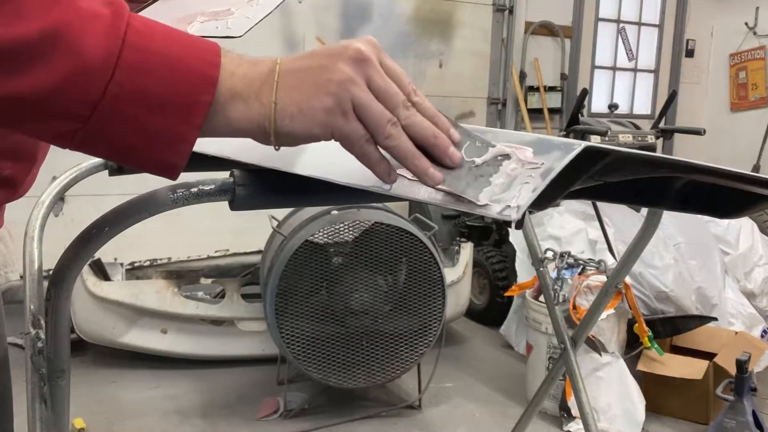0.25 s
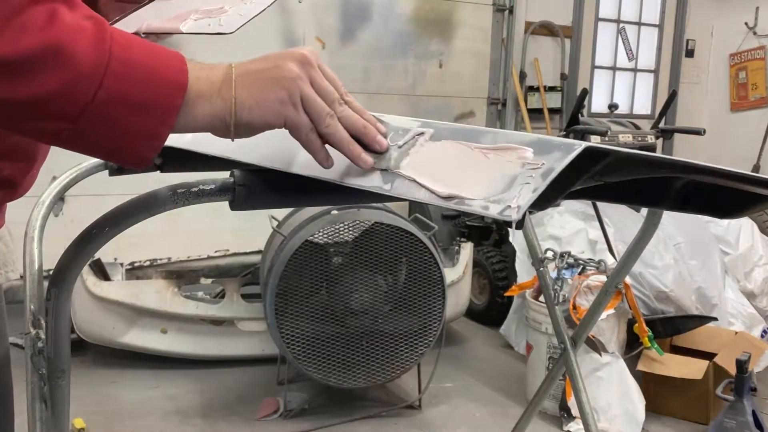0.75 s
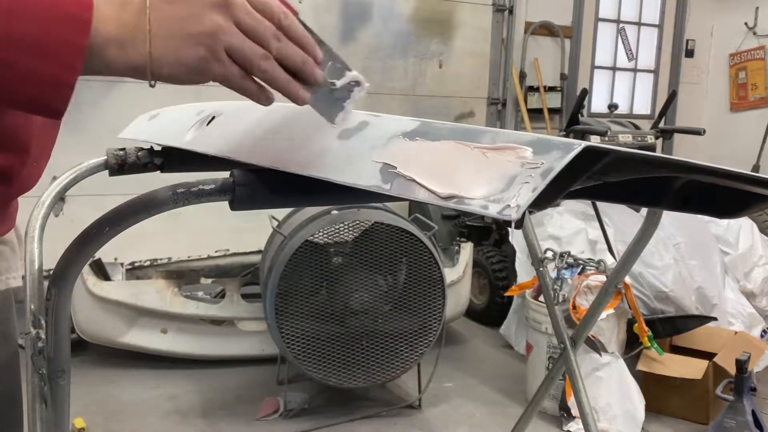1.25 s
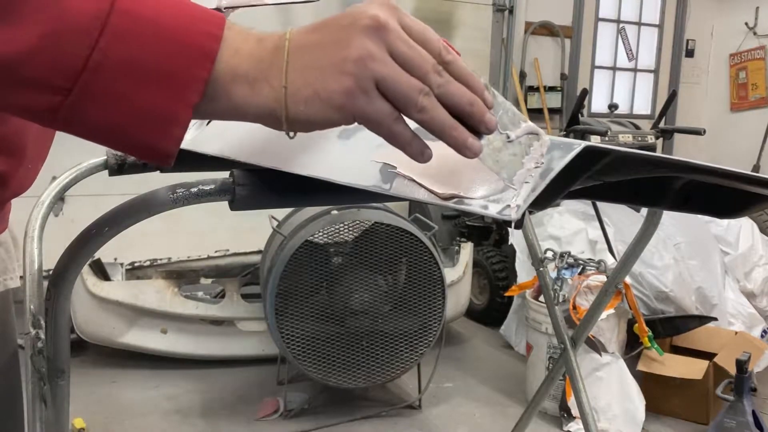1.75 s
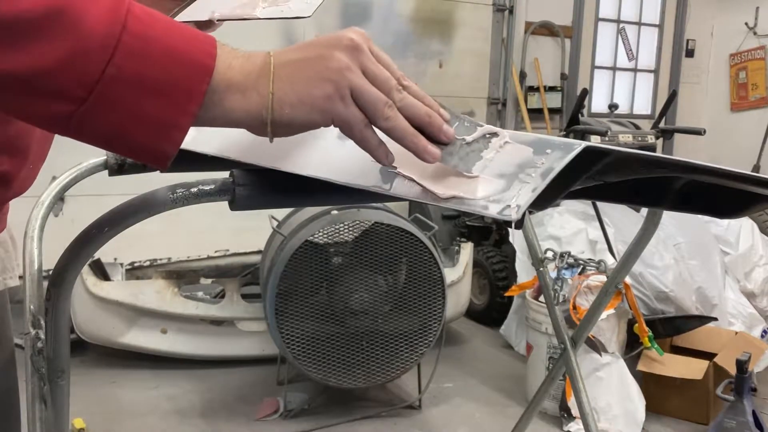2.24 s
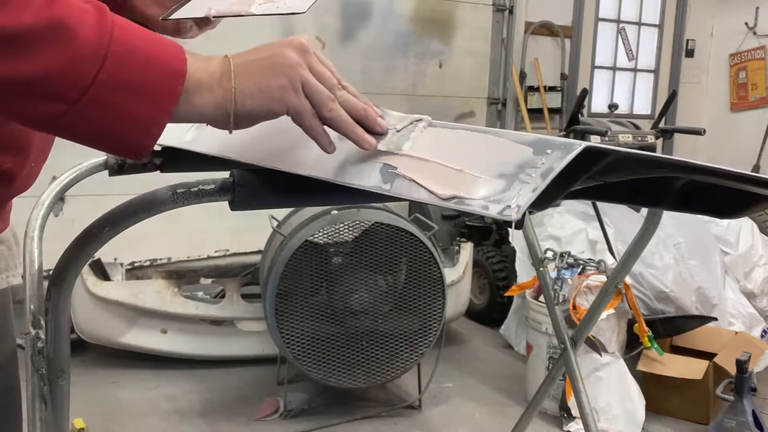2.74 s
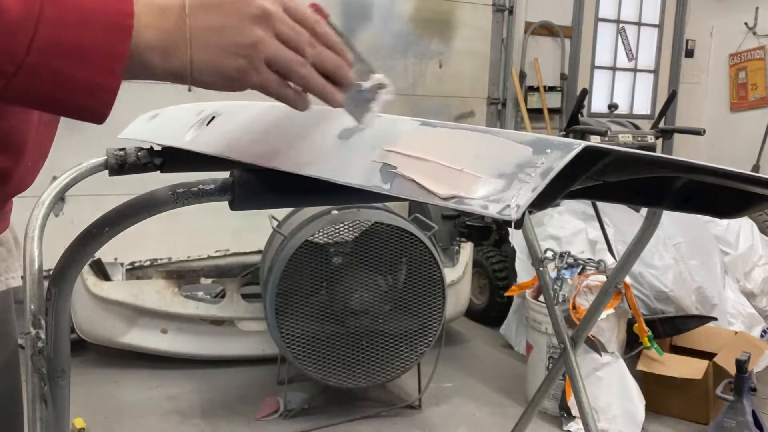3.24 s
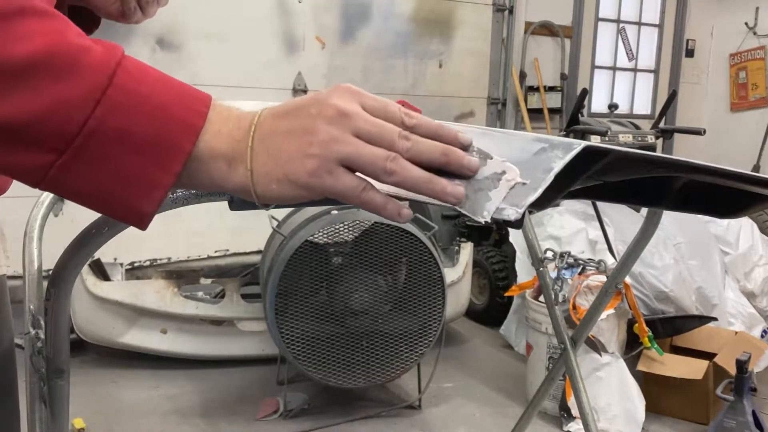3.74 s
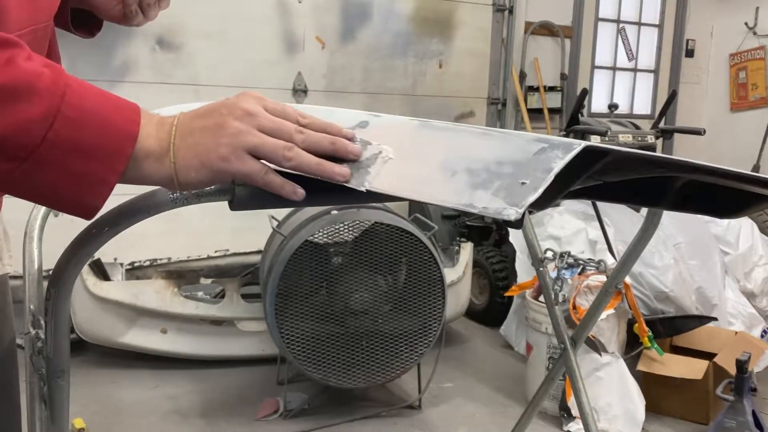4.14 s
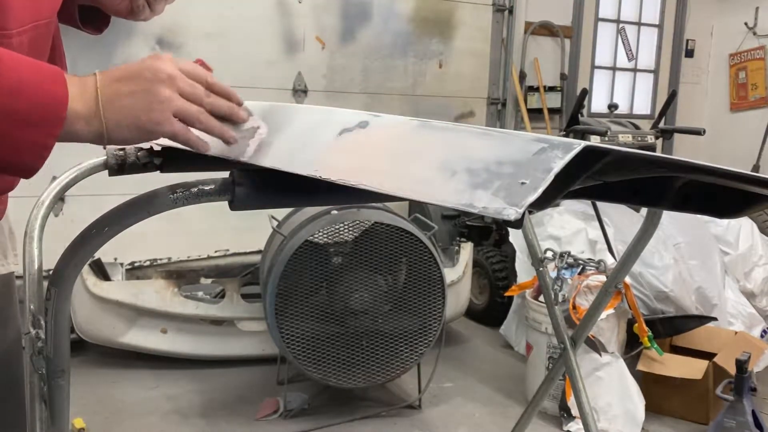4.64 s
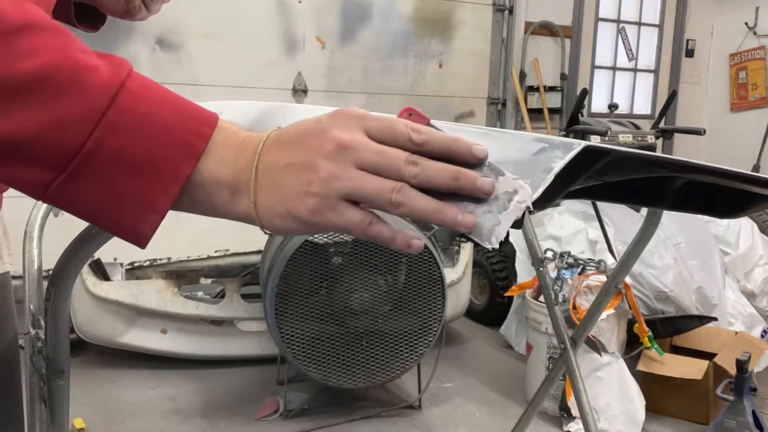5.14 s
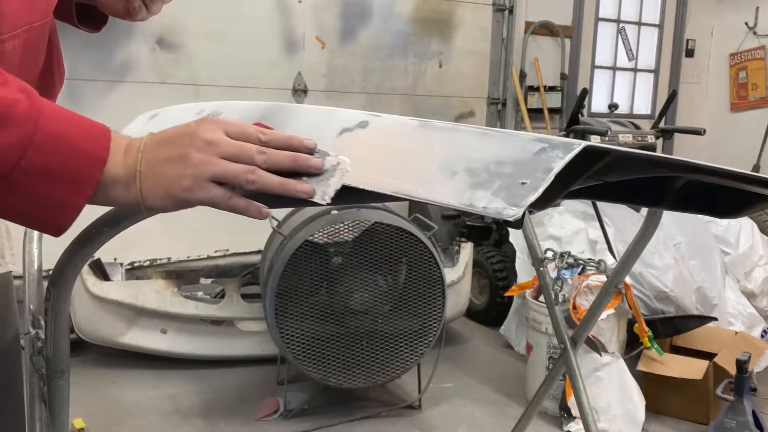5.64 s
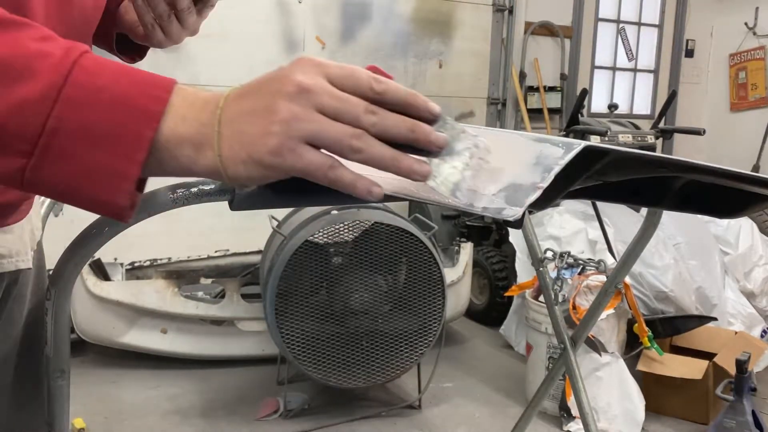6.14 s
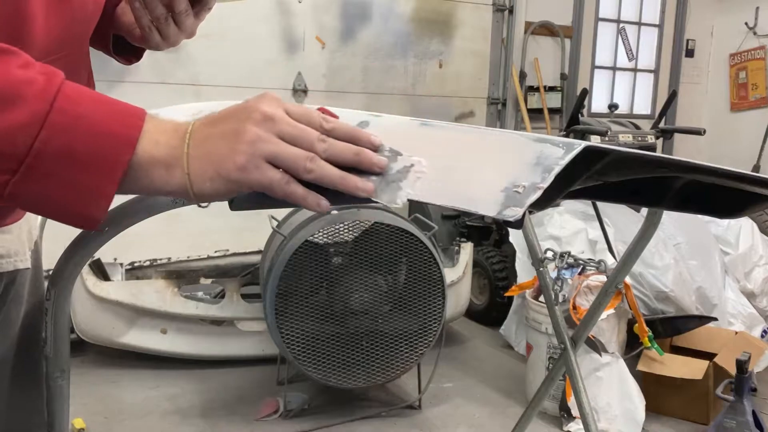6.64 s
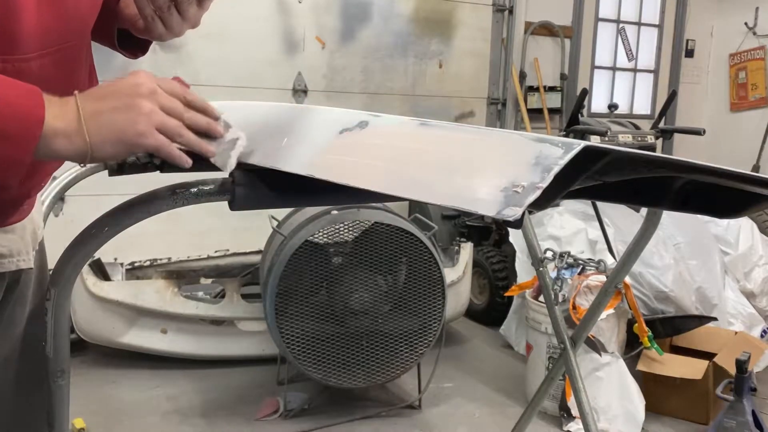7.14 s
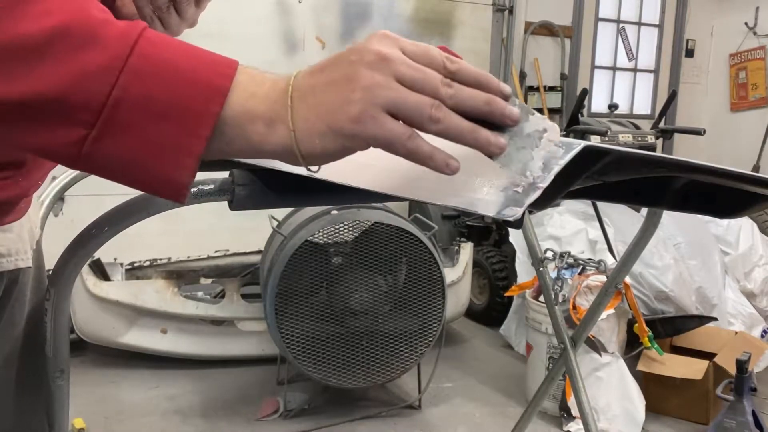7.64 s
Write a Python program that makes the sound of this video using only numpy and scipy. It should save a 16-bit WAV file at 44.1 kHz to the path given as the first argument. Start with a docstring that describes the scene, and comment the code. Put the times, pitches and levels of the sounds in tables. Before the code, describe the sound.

In a hard-walled garage, a plastic spreader lays filler on a sheet-metal panel. It taps down, rasps dryly for a fraction of a second, flicks off with a bright snap, then nearly vanishes as it glides over wet filler. Roughly one stroke comes per second, with louder slaps before two and near three and a half seconds and a brief judder past five. Close stereo microphones catch short room echoes and low, steady air.

```python
"""In a garage, a plastic spreader lays body filler on a sheet-metal panel on a stand.
The blade knocks down, rasps over bare metal until it flicks off, and glides almost silently on wet filler.
Rubbing is noise made of tiny slips; landings are noise bursts, snaps and a squeak are decaying or gliding tones.
Rubbing and knocks ring the panel, and the hard room answers at two microphones over steady room air."""
import sys
import numpy as np
from scipy import signal
from scipy.fft import rfft, irfft, next_fast_len
from scipy.io import wavfile
from scipy.ndimage import uniform_filter1d

SR = 44100
rng = np.random.default_rng(int(sys.argv[2]) if len(sys.argv) > 2 else 0)


def dump(signal):
    """Clip the signal to [-1, 1] and save it as 16-bit WAV at the path in sys.argv[1]."""
    limited = np.clip(np.atleast_2d(signal).T, -1, 1)
    pcm = np.round(limited * 32767).astype(np.int16)
    wavfile.write(sys.argv[1], SR, pcm)


N = 347508
TIME = np.arange(N) / SR
CLOCK = np.arange(0, N / SR, .001)  # coarse time in seconds, for the movements of the hand

# The blade rasps over bare metal and flicks off. All levels are relative, before the mix.
# Each row: start in seconds, lift in seconds, attack in seconds, level in dB, swell in dB, brightness in dB,
# flick in dB, flick length in seconds, brightening in the flick in dB, favoured resonance in Hz, its gain in dB,
# sway of the stand in dB.
RASPS = [ (0.124, 0.288, 0.055, -32, -4.5, -7.5, -1.5, 0.0039, 21, 1710, 4, -43.5),
         (0.968, 1.141, 0.057, -36.5, 4.5, -2, 8, 0.0078, 6.5, 1710, 0.5, -48.5),
         (1.942, 2.099, 0.051, -35, 1, -4.5, 2.5, 0.045, -12.5, 1900, -2.5, -66),
         (2.867, 3.112, 0.045, -36, 4.5, 0.5, 2, 0.027, 5.5, 1720, 2, -56),
         (3.737, 3.879, 0.021, -37.5, 7.5, -12.5, 4, 0.016, 8, 4560, 3, -56),
         (4.394, 4.536, 0.033, -35.5, 2, 2.5, 3, 0.012, 1, 10270, 2.5, -47.5),
         (5.73, 5.858, 0.024, -31.5, -1, 0.5, 10, 0.041, 6, 553, 6, -49.5),
         (6.371, 6.44, 0.036, -39, -1, -14.5, 3.5, 0.016, 11, 2430, 1.5, -72.5),
         (6.976, 7.093, 0.024, -35.5, 10, 4.5, 6, 0.03, -4.5, 403, 10.5, -68.5)]
# The blade glides on wet filler. Each row: start in seconds, end in seconds, level in dB, swell in dB,
# final brightness in dB, favoured resonance in Hz, its gain in dB, sway of the stand in dB.
GLIDES = [ (0.55, 0.85, -80, 23.5, -2.5, 1420, -6, -44), (0.775, 1.0, -61, -3.5, 15.5, 1450, 12, -50),
          (2.283, 2.697, -64, -5, -0.5, 820, 9.5, -45.5), (2.594, 2.94, -68.5, 12, 8, 1690, -14, -66),
          (4.2, 4.444, -79.5, 15, 3, 830, 11, -58.5), (4.82, 5.168, -66.5, -9, -4, 840, 15, -66),
          (6.45, 6.74, -60.5, -10.5, -3, 3700, 6, -58), (6.60, 7.03, -69, 3, -0.5, 784, 13.5, -50)]
# The blade lands on the panel. Each row: time in seconds, level in dB, settling time in seconds,
# level of the edge's tick in dB, favoured resonance in Hz, its gain in dB, sway of the stand in dB.
LANDINGS = [ (0.0, -31, 0.0063, -40, 366, 15.5, -44), (1.841, -23.5, 0.008, -33.5, 1000, -17, -59),
            (3.63, -24.5, 0.0078, -29.5, 645, 2.5, -46), (3.696, -35.5, 0.007, -44, 960, 3, -62),
            (6.302, -36, 0.0092, -63, 620, 10, -57), (7.71, -46, 0.014, -58.5, 420, -13, -62)]

RELEASE_S = 0.026  # once lifted, the rasp dies away
# The blade, dragged flat, judders once: pressed harder up to a crest, then eased off.
JUDDER_START_S, JUDDER_CREST_S, JUDDER_END_S = 5.187, 5.462, 5.55


def gain_of(db):
    """Decibels to a factor."""
    return 10 ** (np.asarray(db) / 20)


def evened(x):
    """Scales to rms 1."""
    return x / np.sqrt(np.mean(x ** 2) + 1e-20)


def read(points, hz):
    """Joins the points by straight lines over log frequency."""
    f, value = np.transpose(points)
    return np.interp(np.log(hz + 1), np.log(f + 1), value)


def add(mix, s, sound):
    """Mixes a sound in at a time in seconds."""
    part = mix[max(round(s * SR), 0):][:len(sound)]
    part += sound[:len(part)]


def ramp(s, length_s):
    """Rises from 0 to 1, starting at a time."""
    return np.clip((CLOCK - s) / length_s, 0, 1)


def coloured(x, spectrum):
    """Gives a sound a spectrum, at rms 1."""
    length = x.shape[-1]
    size = next_fast_len(length)
    colour = gain_of(read(spectrum, np.fft.rfftfreq(size, 1 / SR)))
    return evened(irfft(rfft(x, size) * colour, size)[..., :length])


def joined(contacts):
    """Joins the (level, brightness dB) of several contacts; the louder one weighs more in the brightness."""
    level, bright_db = np.array(contacts).transpose(1, 0, 2)
    total = level.sum(0)
    return total, (level * bright_db).sum(0) / (total + 1e-12)


def rasping(bite_s=0.018, bite_dull_db=-1.5, dulling_db_per_s=1102, dullest_db=-35):
    """Level and brightness of the rasps: the edge bites, pressure swells, a flick, then release, treble first."""
    contacts = []
    for start, lift, attack_s, db, swell_db, bright_db, flick_db, flick_s, flick_bright_db, *_ in RASPS:
        flick = np.exp(-((CLOCK - lift) / flick_s) ** 2)
        lifted_s = np.maximum(CLOCK - lift, 0)
        pressure_db = db + swell_db * ramp(start, lift - start) + flick_db * flick
        level = ramp(start, attack_s) * gain_of(pressure_db) * np.exp(-lifted_s / RELEASE_S)
        # duller until the edge bites
        bright = bright_db + bite_dull_db * (1 - ramp(start, bite_s))
        bright = bright + flick_bright_db * flick - dulling_db_per_s * lifted_s
        contacts.append((level, np.maximum(bright, dullest_db)))
    return joined(contacts)


def gliding(fade_s=0.095, thinning_db_per_s=38):
    """Level and brightness of the glides: soft ends, an even swell, brighter as the filler thins out."""
    contacts = []
    for start, end, db, swell_db, bright_db, *_ in GLIDES:
        along = ramp(start, end - start)
        ends = ramp(start, fade_s) * (1 - ramp(end - fade_s, fade_s))
        bright = bright_db - thinning_db_per_s * (end - start) * (1 - along)
        contacts.append((ends * gain_of(db + swell_db * along), bright))
    return joined(contacts)


def juddering(attack_s=0.014, crest_db=-32, crest_bright_db=-2, eased_bright_db=-5):
    """Level and brightness of the judder: both grow with pressure up to the crest, then fall."""
    press_db_per_s, ease_db_per_s, bright_per_db = 12, 78, 3.5
    press_s, ease_s = JUDDER_CREST_S - JUDDER_START_S, JUDDER_END_S - JUDDER_CREST_S
    press_db = -press_db_per_s * press_s * (1 - ramp(JUDDER_START_S, press_s))
    eased = ramp(JUDDER_CREST_S, ease_s)
    touch = ramp(JUDDER_START_S, attack_s) * (1 - ramp(JUDDER_END_S, attack_s))
    level = touch * gain_of(crest_db + press_db - ease_db_per_s * ease_s * eased)
    return level, crest_bright_db + bright_per_db * press_db + eased_bright_db * eased


def friction(level, bright_db, slips_per_s, spread_db, hiss, patchy_db=2.0, dull_hz=1400, bright_hz=6500):
    """Countless tiny slips of uneven size; a steeper, drier edge tilts them towards the treble."""
    # Spectrum of the rubbing edge. Each row: frequency in Hz, relative level in dB.
    rub_colour = [(100, -29), (280, -24), (380, -8), (650, -1), (1000, -1), (1800, -1), (2600, -2.5),
                  (3700, -3.5), (6000, -5.5), (8000, -10), (10000, -9), (12200, -10), (15200, -12.5)]
    happens = rng.random(N) < slips_per_s / SR
    size = gain_of(spread_db * np.minimum(rng.exponential(1, N), 4))
    slips = happens * rng.choice([-1, 1], N) * size
    grit = coloured(evened(slips) + hiss * rng.standard_normal(N), rub_colour)
    hz, t, z = signal.stft(grit, SR, nperseg=256)
    tilt_db = read([(dull_hz, 0), (bright_hz, 1)], hz)[:, None] * np.interp(t, CLOCK, bright_db)
    # the edge meets ever new sanding marks, so its colour wanders in small patches
    patches = uniform_filter1d(rng.standard_normal(z.shape), size=4, axis=0)
    patches = evened(uniform_filter1d(patches, size=8, axis=1))
    shaped = signal.istft(z * gain_of(tilt_db + patchy_db * patches), SR, nperseg=256)[1][:N]
    return np.interp(TIME, CLOCK, level) * shaped


def singing(rub, spots, q=9.5):
    """The contact feeds a favoured resonance while the blade stays near a spot: (from s, to s, Hz, gain dB)."""
    out = np.zeros(N)
    for start, end, hz, db in spots:
        part = rub[max(round(start * SR), 0):round(end * SR)]
        # the padding leaves room for the resonance to die away
        drive = np.pad(part * signal.windows.tukey(len(part), .1), (0, SR // 20))
        add(out, start, gain_of(db) * signal.lfilter(*signal.iirpeak(hz, q, SR), drive))
    return out


def landings(tick_s=0.0099, lag_s=0.00025):
    """The edge ticks, then the blade slaps flat in a quickly settling chatter."""
    # Spectrum of the slap. Each row: frequency in Hz, relative level in dB.
    knock_colour = [(60, -5), (200, -11), (300, -9.5), (380, -4), (700, -1), (1000, -4.5), (1800, -5.5),
                    (2700, -14.5), (4000, -30.5), (7000, -36.5), (12000, -40), (16000, -43)]
    tick_colour = [(500, 3), (4000, 6.0), (6000, -5.5), (15000, -32.0)]  # Hz, dB
    t, out = np.arange(SR // 4) / SR, np.zeros(N)
    for s, db, settle_s, tick_db, *_ in LANDINGS:
        chatter, tick = rng.standard_normal((2, len(t)))
        u = np.maximum(t - lag_s, 0) / settle_s
        add(out, s, gain_of(db) * u * np.exp(1 - u) * coloured(chatter, knock_colour))
        add(out, s, gain_of(tick_db) * np.exp(-t / tick_s) * coloured(tick, tick_colour))
    return out


def snaps(cycles=0.72, upper_hz=10600, crack_s=0.0018, crack=0.19):
    """The stiff plastic catches or springs back: two briefly ringing modes and a sharp crack."""
    # Each row: time in seconds, level of the main mode in dB, its pitch in Hz,
    # upper mode in dB relative to the main one.
    edge_snaps = [(0.284, -8, 3400, -3), (1.1421, -7.5, 4360, -10.5), (2.089, -20.5, 4660, -12),
                  (2.133, -26, 5000, -10), (3.108, -14, 3950, -10), (3.496, -52, 6000, -7),
                  (3.817, -24, 4840, -19), (4.535, -10.5, 7000, -4), (7.091, -12, 5370, -11.5)]
    t, out = np.arange(SR // 50) / SR, np.zeros(N)
    for s, db, hz, upper_db in edge_snaps:
        main, upper = (np.sin(2 * np.pi * f * t) * np.exp(-t * f / cycles) for f in (hz, upper_hz))
        noise = crack * rng.standard_normal(len(t)) * np.exp(-t / crack_s)
        add(out, s, gain_of(db) * (main + gain_of(upper_db) * upper + noise))
    return out


def squeak(level_db=-67, waver=0.0067):
    """The edge squeaks thinly in the filler: a faint, unsteady, falling whistle."""
    # Each row: time in seconds, pitch in Hz.
    whistle = [(2.289, 10700), (2.469, 9600)]
    s, hz = np.transpose(whistle)
    t, out = np.arange(s[0], s[-1], 1 / SR), np.zeros(N)
    wander = evened(uniform_filter1d(rng.standard_normal(len(t)), size=60))
    pitch = np.interp(t, s, hz) * (1 + waver * wander)
    tone = np.sin(2 * np.pi * np.cumsum(pitch) / SR)
    add(out, s[0], gain_of(level_db) * np.hanning(len(t)) * tone)
    return out


def ring(x, modes):
    """Drives decaying modes (Hz, gain at resonance in dB, t60 s), followed for half a second."""
    t = np.arange(SR // 2) / SR
    response = 0
    for hz, db, t60 in modes:
        decay = gain_of(-60 * t / t60)
        response = response + gain_of(db) * 2 * decay / decay.sum() * np.cos(2 * np.pi * hz * t)
    return signal.oaconvolve(x, response)[:N]


def paired(two):
    """Two unrelated signals become a diffuse field at the two microphones, most alike in the bass."""
    # Likeness of left and right in a diffuse field. Each row: frequency in Hz, correlation from -1 to 1.
    likeness = [(40, 1), (130, 0.79), (350, 0.64), (700, -0.018), (1500, 0.18), (3000, 0.031),
                (14000, 0.056)]
    hz, _, (a, b) = signal.stft(two, SR, nperseg=1024)
    same = np.clip(read(likeness, hz), -1, 1)[:, None]
    mid, side = a * np.sqrt((1 + same) / 2), b * np.sqrt((1 - same) / 2)
    return signal.istft(np.array([mid + side, mid - side]), SR, nperseg=1024)[1][:, :two.shape[1]]


def reflections(early, early_s):
    """Sparse echoes, strongest from the near clutter, each band rising and dying at its own speed."""
    # Decay of the garage. Each row: frequency in Hz, t60 in seconds.
    decay_times = [(250, 0.63), (660, 0.47), (1740, 0.4), (4600, 0.39), (8000, .36), (12000, 0.27)]
    # Build-up of the echoes, slower in the bass than in the treble. Each row: frequency in Hz, rise in seconds.
    rise_times = [(300, 0.0094), (1200, .012), (4000, .003), (10000, .001)]
    t = np.arange(SR * 3 // 4) / SR
    signs = rng.choice([-1., 1.], (2, len(t)))
    taps = signs * (rng.random((2, len(t))) < 1 / 8) * (t > .001)
    hz, at, z = signal.stft(paired(taps), SR, nperseg=256)
    z = z * gain_of(-60 * at / read(decay_times, hz)[:, None])
    z = z * (1 - np.exp(-(at + at[1] / 2) / read(rise_times, hz)[:, None]))
    tail = signal.istft(z, SR, nperseg=256)[1][:, :len(t)]
    tail = tail * (1 + early * np.exp(-t / early_s))
    return tail / np.linalg.norm(tail[0])


def garage(x, direct_db, wet_db, early=2.75, early_s=0.0042, drift_per_s=1.7):
    """The direct sound reaches the left microphone first; two echo patterns trade places as the hand moves."""
    turn = 2 * np.pi * drift_per_s * TIME
    wet = 0
    for share in (np.cos(turn), np.sin(turn)):
        wet = wet + signal.oaconvolve((x * share)[None], reflections(early, early_s), axes=1)[:, :N]
    direct = np.array([x, np.concatenate([np.zeros(2), x[:-2]])])  # right is two samples late
    return gain_of(direct_db) * direct + gain_of(wet_db) * wet


def background(air_db=-58, sway_rise_s=0.064, rest_sway_db=-57, rest_drum_db=-61):
    """Steady room air, and the panel swaying and drumming on its stand as the hand works."""
    # Spectra of the room air, the swaying stand and the drumming sheet.
    # Each row: frequency in Hz, relative level in dB.
    air_colour = [(20, -14), (35, -17), (65, 2), (120, -5), (180, -11.5), (300, -16.5), (600, -23.5),
                  (1500, -34.5), (4000, -39), (6500, -38), (8500, -47), (10400, -32), (12800, -50),
                  (16000, -49)]
    sway_colour = [(20, -28.5), (36, -19), (48, 4), (58, -7.5), (76, -21), (200, -34), (600, -78.5)]
    drum_colour = [(30, -33.5), (75, -11.5), (97, 4), (125, -12), (200, -27), (600, -56.5)]
    drum_by_sway_db, drum_by_judder_db, drum_lag_s = -15, -15.5, 0.18  # drums with the sway, after the judder
    air, sway, drum = (paired(rng.standard_normal((2, N))) for _ in range(3))
    # every landing, glide and lift nudges the stand: its sway builds up and dies away
    nudges = [(row[0], row[-1]) for row in LANDINGS]
    nudges += [(row[0], row[-1]) for row in GLIDES]
    nudges += [(row[1], row[-1]) for row in RASPS]
    nudged = 0
    for s, db in nudges:
        u = np.maximum(CLOCK - s, 0) / sway_rise_s
        nudged = np.hypot(nudged, gain_of(db) * u * np.exp(1 - u))
    nudged = np.interp(TIME, CLOCK, nudged)
    shaken = np.interp(TIME - drum_lag_s, CLOCK, juddering()[0])
    drummed = gain_of(drum_by_sway_db) * nudged + gain_of(drum_by_judder_db) * shaken
    low = np.hypot(gain_of(rest_sway_db), nudged) * coloured(sway, sway_colour)
    low += np.hypot(gain_of(rest_drum_db), drummed) * coloured(drum, drum_colour)
    return gain_of(air_db) * coloured(air, air_colour) + low


def scene(rasp_db=-1, judder_db=-2, glide_db=-2, knock_db=-3):
    """Rubs and knocks ring the panel in the garage, beside snaps, a squeak and the background."""
    # Ringing of the panel, and of the flat-held blade.
    # Each row: frequency in Hz, relative gain in dB, t60 in seconds.
    panel = [(390, -1, 0.047), (421.6, -6, 0.24), (577, 0.5, 0.1), (679, 3.5, 0.18), (959, -18, 0.18),
             (967, 6.5, 0.039), (1018, 3, 0.3), (1130, -18.5, 0.93), (1498, 5.5, 0.17), (1730, -7, .55),
             (1790, -7.5, 0.3), (2200, -10, 0.21), (3066, -2, 0.6), (3389, 6, .3), (4060, -6, 0.41),
             (4260, -4.5, .6), (6235, -6, .55), (7200, -7, .55)]
    blade = [(1174, -1, 0.029), (1747, 3, 0.016), (2280, 6.5, 0.022), (3500, 10, 0.0078),
             (4360, -11, 0.014), (6390, 3, 0.0082)]
    rasp = gain_of(rasp_db) * friction(*rasping(), slips_per_s=5000, spread_db=4, hiss=0.93)
    glide = gain_of(glide_db) * friction(*gliding(), slips_per_s=5700, spread_db=5.0, hiss=0.43)
    judder = gain_of(judder_db) * friction(*juddering(), slips_per_s=2300, spread_db=-0.5, hiss=0.96)
    rub = rasp + glide + 0.69 * judder + ring(judder, blade)

    sung = singing(rasp, [(start, lift + 2 * RELEASE_S, hz, db) for start, lift, *_, hz, db, _ in RASPS])
    sung += singing(glide, [(start, end, hz, db) for start, end, *_, hz, db, _ in GLIDES])
    sung += singing(judder, [(5.32, JUDDER_END_S, 476, 10.5)])  # once pressed hard

    knock = gain_of(knock_db) * landings()
    landing_s = 0.083  # how long a landing feeds its resonance
    knock_sung = singing(knock, [(s, s + landing_s, hz, db) for s, *_, hz, db, _ in LANDINGS])

    rubbed = rub + sung + .5 * ring(rub, panel)
    knocked = 0.72 * knock + knock_sung + 1.6 * ring(knock, panel)
    sound = garage(rubbed, direct_db=-7, wet_db=3, early=3.4)
    sound += garage(knocked, direct_db=-3.5, wet_db=2.5, early=2.0)
    sound += garage(snaps(), direct_db=0, wet_db=2, early=.8)
    return sound + squeak() + background()


def record(dry):
    """The overall tone colour and left-right lean, then a band limit."""
    # Overall tone colour, with a narrow gap in the top treble. Each row: frequency in Hz, gain in dB.
    tone_colour = [(20, 0), (12200, 2.5), (13000, -30.5), (13550, -29), (14300, 3.5), (15500, 2)]
    # Lean between left and right. Each row: frequency in Hz, left minus right in dB.
    lean = [(100, -1.5), (350, 1.5), (700, 0.5), (1400, 0.5), (2800, 2), (5600, 3), (10000, -1.5),
            (15000, 1)]
    edge_hz = 15900
    size = next_fast_len(N)
    hz = np.fft.rfftfreq(size, 1 / SR)
    colour_db = read(tone_colour, hz) + np.array([[.5], [-.5]]) * read(lean, hz)
    heard = irfft(rfft(dry, size) * gain_of(colour_db), size)[:, :N]
    band_limit = signal.firwin(511, edge_hz, window=("kaiser", 9), fs=SR)
    return signal.oaconvolve(heard, band_limit[None], "same")


dry = scene()
out = record(dry)
dump(out)
```